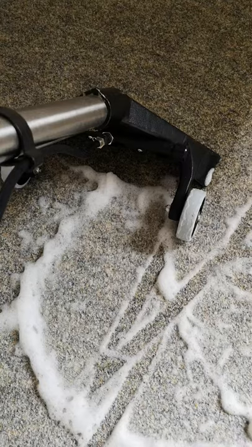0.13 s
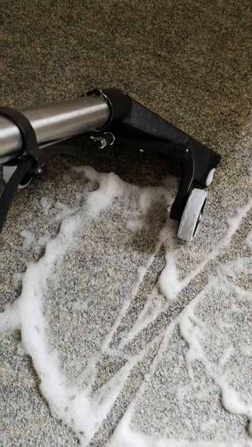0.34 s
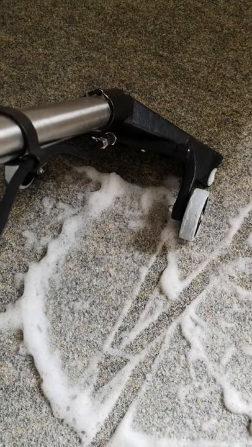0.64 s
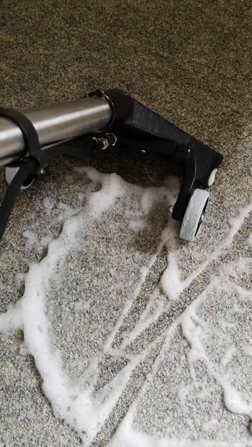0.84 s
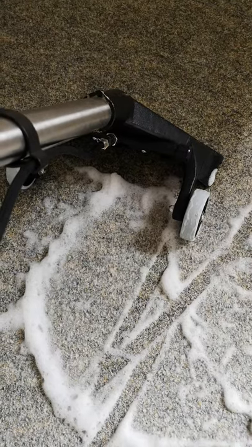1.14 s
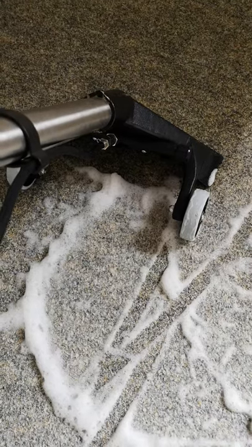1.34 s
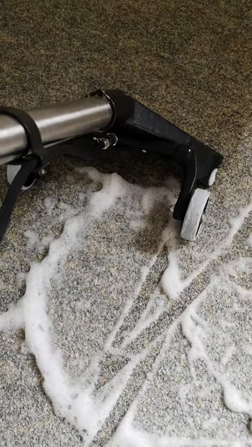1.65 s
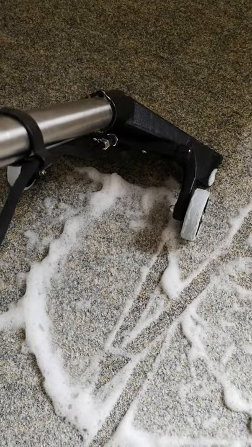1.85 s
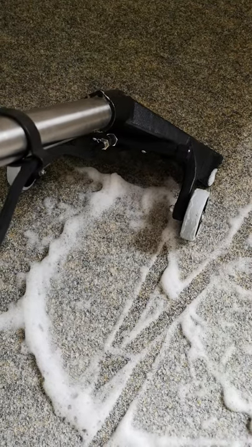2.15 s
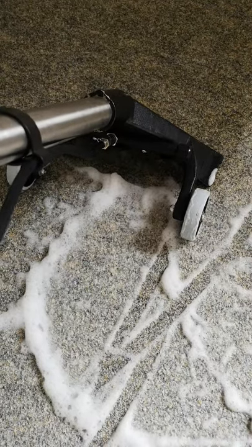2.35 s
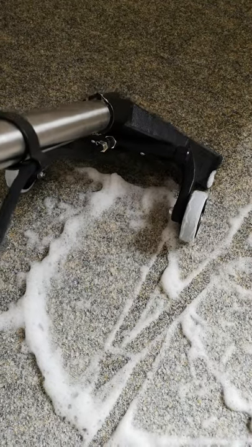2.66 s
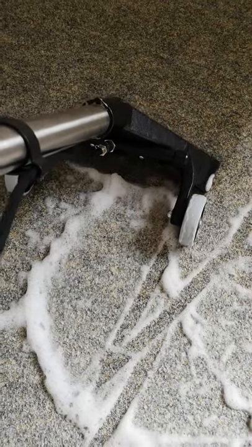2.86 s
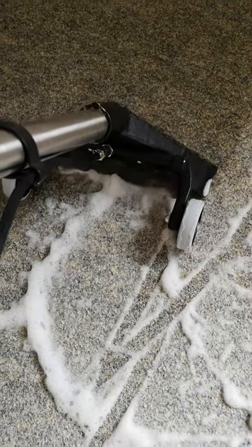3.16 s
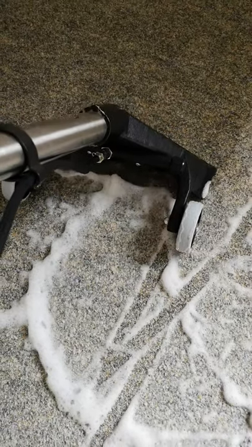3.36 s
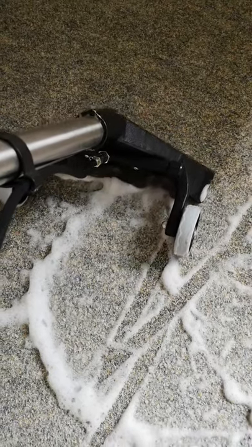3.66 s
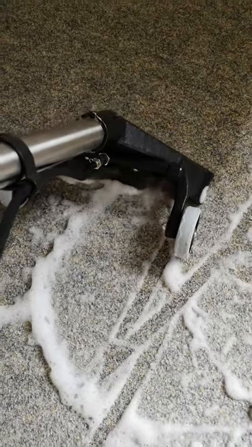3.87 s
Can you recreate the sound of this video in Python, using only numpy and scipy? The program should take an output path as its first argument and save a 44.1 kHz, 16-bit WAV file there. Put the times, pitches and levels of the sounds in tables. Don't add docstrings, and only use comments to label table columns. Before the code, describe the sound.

Loud, constant carpet extractor motor and suction noise indoors, with thin high fan whine and low hose drone; after a brief puff, the slot hiss grows as the handheld stereo microphone moves closer.

```python
import sys
import numpy as np
from scipy import signal
from scipy.fft import rfft, irfft
from scipy.io import wavfile

SR = 44100
rng = np.random.default_rng(int(sys.argv[2]) if len(sys.argv) > 2 else 0)


def generate_wav(sig):
    pcm = np.round(np.clip(np.atleast_2d(sig).T, -1, 1) * 32767).astype(np.int16)
    wavfile.write(sys.argv[1], SR, pcm)


def magnitude_from_level(level_db):
    exponent = np.asarray(level_db, float) / 20
    return 10 ** exponent


N = 176400

LEFT_LAG_S = 26 / 44100

# start_s, level_db
LOUDNESS = [(.45, -23.5), (1.05, -24), (1.35, -23), (1.7, -24), (2.1, -24), (2.45, -24), (2.6, -24),
            (3.0, -23.5), (3.3, -24), (3.6, -24), (4, -23.5)]
# start_s, facing_share (0-1)
FACING = [
    (.45, 0.84),
    (.7, 1.01),
    (.97, 0.99),
    (1.07, 0.13),
    (4, 0.27),
]
# start_s, near_share (0-1)
NEARNESS = [
    (.45, 0.03),
    (1.5, 0.12),
    (1.7, 0.54),
    (2.1, 0.7),
    (2.6, 0.8),
    (3.0, 1.05),
    (3.4, .95),
    (4, .85),
]
# pitch_hz, level_db (per Hz)
RUMBLE = [(25, -18), (34, -14), (47, -9.5), (66, -9.5), (82, -24), (135, -12), (256, -3), (600, -9)]
# pitch_hz, level_db (per Hz)
ROAR_LEFT = [(500, -59.5), (1500, -65), (2300, -59.5), (3300, -68), (7600, -67.5), (9500, -83.5),
             (9900, -88.5), (15000, -92)]
ROAR_RIGHT = [(500, -60), (2300, -59.5), (3200, -64.5), (5700, -59.5), (7600, -65.5), (8800, -75.5),
              (12000, -76), (15000, -82)]
# centre_hz, width_hz, left_db, right_db
HOLLOWS = [(256, 51, 2.5, -1), (373, 13, 2.5, 0), (944, 81, 5, 2), (1215, 30, 7, 0.5), (2686, 134, 1.5, 3),
           (4570, 170, 3.5, 2.5), (5600, 570, 4, 0.5), (7570, 690, 5.5, 1), (9300, 400, 1.5, -1.7)]
# pitch_hz, change_db
FACING_LEFT = [(100, 3.5), (300, 2.5), (900, 1.5), (2300, -1.5), (4500, 1.5), (6000, -12), (7600, 6.5),
               (12000, -11)]
FACING_RIGHT = [(100, 2.7), (300, 5.3), (900, 3.7), (2300, 4.3), (4500, 5.2), (7000, 5.5), (11000, 4.8),
                (14000, .6)]
# pitch_hz, change_db
NEAR_LEFT = [(300, -1.7), (2000, 1.9), (3300, 2.1), (5800, 1.5), (8000, 0.4), (10500, 7), (13000, 4),
             (15000, 3)]
NEAR_RIGHT = [(300, .1), (2000, 1.1), (5500, 1.7), (7500, .1), (10500, 5.5), (12800, 1.1), (14200, 10.8),
              (15200, 18)]
# pitch_hz, direct_share (0-1)
DIRECT = [(60, 1), (160, 0.97), (270, 1), (500, 0.69), (1000, 0.08), (3000, 0.18), (10000, 0)]
# start_s, second_harmonic_hz, left_db, right_db
FAN = [(.46, 4588, -46, -37), (.9, 4589, -49, -39.5), (1.15, 4592, -48, -43), (1.6, 4589, -42, -40),
       (2.0, 4592, -46, -47), (2.5, 4590, -53, -53), (3.05, 4600, -47, -53), (3.4, 4612, -52, -46),
       (4, 4624, -54, -45)]
# multiple (of the second harmonic), left_db, right_db
FAN_TONES = [
    (.5, -8, -1.5),
    (1, 1, .5),
    (2, -14, -18),
]
# centre_hz, width_hz, left_db, right_db
WHINES = [(100, 8, -51, -51), (140, 14, -53, -53), (226, 14, -49, -49), (348, 30, -48, -48),
          (296, 12, -49, -47), (894, 16, -54, -49), (1253, 16, -55, -50), (1913, 7, -49, -53),
          (3828, 12, -58, -54), (3996, 16, -61, -53), (4671, 20, -56, -50), (5430, 40, -54, -51),
          (5720, 40, -60, -51), (8418, 10, -61, -66)]
# start_s, pitch_hz, level_db
DRONE = [(.46, 262, -37), (.55, 262, -33), (.82, 259, -33), (.95, 262, -42), (1.7, 262, -42),
         (2.15, 256, -41), (2.35, 261, -35), (2.6, 263, -37), (2.9, 260, -38), (3.15, 248, -38),
         (3.35, 228, -36), (3.5, 228, -43), (3.8, 226, -42), (4, 230, -44)]


def in_time(rows):
    start_s, *columns = np.transpose(rows)
    return [np.interp(np.arange(N) / SR, start_s, column) for column in columns]


def at_hz(points, hz):
    pitch_hz, value = np.transpose(points)
    return np.interp(np.log(hz), np.log(pitch_hz), value)


def drift(rate_hz):
    r = np.exp(-80 * np.pi * rate_hz / SR)
    slow = signal.lfilter([1], [1, -2 * r, r * r], rng.standard_normal(N // 40 + 2002))[2000:]
    return np.interp(np.arange(N) / 40, np.arange(len(slow)), slow / slow.std())


def turbulence(hz):
    shared, left, right = rfft(rng.standard_normal((3, N)))
    direct = np.clip(at_hz(DIRECT, hz), 0, 1)
    arrival = np.array([np.exp(-2j * np.pi * hz * LEFT_LAG_S), hz ** 0])
    waves = np.sqrt(direct) * shared * arrival
    waves = waves + np.sqrt(1 - direct) * np.array([left, right])
    rumble_db = at_hz(RUMBLE, hz) - 52
    roar_db = [at_hz(ROAR_LEFT, hz), at_hz(ROAR_RIGHT, hz)]
    colour_db = np.where(hz < 500, rumble_db, roar_db)
    for centre_hz, width_hz, left_db, right_db in HOLLOWS:
        bump = np.exp(-2 * ((hz - centre_hz) / width_hz) ** 2)
        colour_db = colour_db + np.outer([left_db, right_db], bump)
    return waves * magnitude_from_level(colour_db + 64.5)


def air_roar():
    gust_db, patch_db = 0.53, 0.57
    hz = np.maximum(np.arange(N // 2 + 1) * SR / N, 10)
    waves = turbulence(hz)
    (facing,), (near,) = in_time(FACING), in_time(NEARNESS)
    gust = drift(11.3)
    sides = ((FACING_LEFT, NEAR_LEFT), (FACING_RIGHT, NEAR_RIGHT))
    centres = np.concatenate([np.geomspace(40, 7000, 14), np.linspace(8200, 15400, 7)])
    out = 0
    for k, centre_hz in enumerate(centres):
        share = np.interp(hz, centres, np.arange(len(centres)) == k)
        band = irfft(waves * share, N)
        alike = np.clip(at_hz(DIRECT, centre_hz), 0, 1)
        both = drift(11)
        moves_db = []
        for facing_tone, near_tone in sides:
            patch = alike * both + (1 - alike) * drift(6.3)
            turn_db = facing * at_hz(facing_tone, centre_hz)
            approach_db = near * at_hz(near_tone, centre_hz)
            moves_db.append(turn_db + approach_db + patch_db * patch)
        out = out + band * magnitude_from_level(np.array(moves_db) + gust_db * gust)
    return out * magnitude_from_level(in_time(LOUDNESS)[0])


def fan_tones():
    waver_hz, waver_db = 2, 3
    pitch_hz, *level_db = in_time(FAN)
    phase = 2 * np.pi * np.cumsum(pitch_hz + waver_hz * drift(6.4)) / SR
    out = np.zeros((2, N))
    for multiple, *sides_db in FAN_TONES:
        for side in range(2):
            tone_db = level_db[side] + sides_db[side] + waver_db * drift(14)
            tone = np.sin(multiple * phase + rng.uniform(0, 5.3))
            out[side] += np.sqrt(2) * magnitude_from_level(tone_db) * tone
    return out


def whines():
    (facing,) = in_time(FACING)
    out = 0
    for centre_hz, width_hz, left_db, right_db in WHINES:
        r = np.exp(-np.pi * width_hz / SR)
        ring = [1, -2 * r * np.cos(2 * np.pi * centre_hz / SR), r * r]
        tone = rng.standard_normal(N)
        for _ in range(2):
            tone = signal.lfilter([1, 0, -1], ring, tone)
        left_db = left_db + facing * at_hz(FACING_LEFT, centre_hz)
        right_db = right_db + facing * at_hz(FACING_RIGHT, centre_hz)
        out = out + tone / tone.std() * magnitude_from_level(np.array([left_db, right_db]))
    return out


def slurp():
    start_s, length_s = 1.592, .018
    t = np.maximum(np.arange(N) / SR - start_s, 0) / length_s
    swell = t * np.exp(1 - t)
    sides = []
    for level_db, band_hz in ((-31, (1800, 6000)), (-29, (1800, 13500))):
        band = signal.butter(2, band_hz, "band", fs=SR, output="sos")
        sides.append(signal.sosfilt(band, rng.standard_normal(N)) * swell * magnitude_from_level(level_db))
    return np.array(sides)


def drone():
    waver_hz, waver_db, gain_db = 5, 3.5, -3.5
    pitch_hz, level_db = in_time(DRONE)
    phase = 2 * np.pi * np.cumsum(pitch_hz + waver_hz * drift(9.64)) / SR
    lag = 2 * np.pi * pitch_hz * LEFT_LAG_S
    level = magnitude_from_level(level_db + gain_db + waver_db * drift(14.4))
    return np.sqrt(2) * level * np.sin([phase - lag, phase])


def scene():
    return air_roar() + fan_tones() + whines() + slurp() + drone()


def band_limit(x):
    return signal.sosfilt(signal.butter(12, 16500, fs=SR, output="sos"), x)


def record(dry):
    start_s, cutoff_hz = .4487, 15400
    opened = dry * (np.arange(N) >= start_s * SR)
    steep = signal.cheby2(24, 70, cutoff_hz, fs=SR, output="sos")
    mix = signal.sosfilt(steep, opened)
    return band_limit(mix)


dry = scene()
out = record(dry)
generate_wav(out)
```